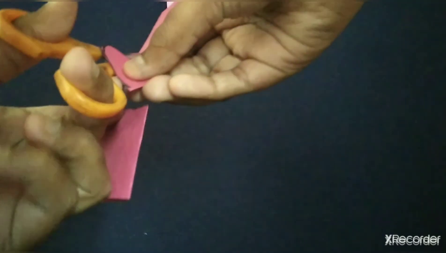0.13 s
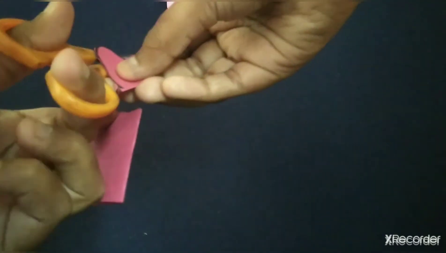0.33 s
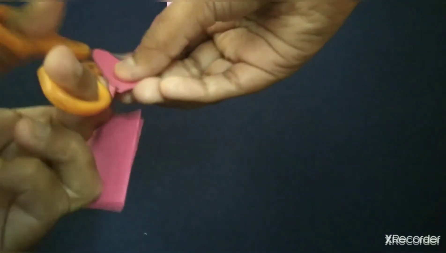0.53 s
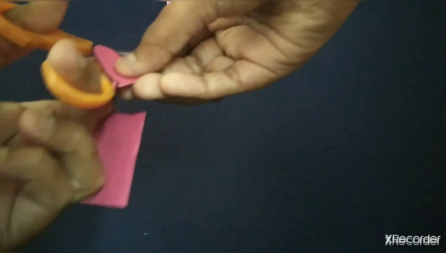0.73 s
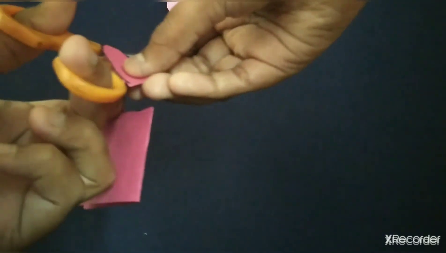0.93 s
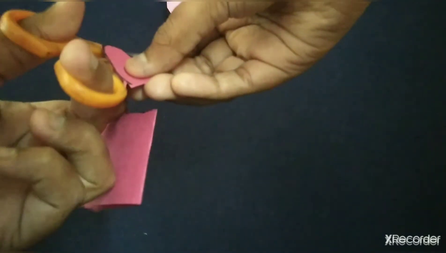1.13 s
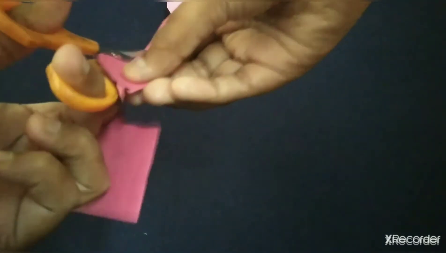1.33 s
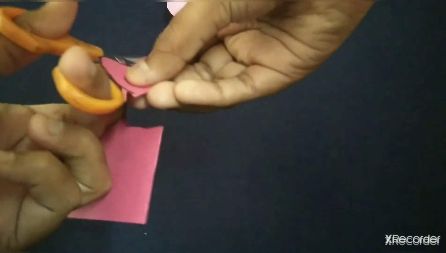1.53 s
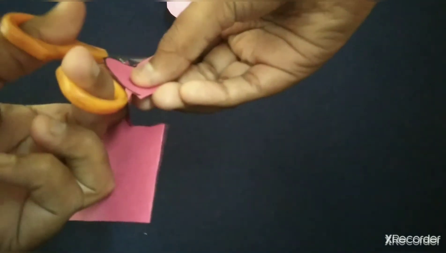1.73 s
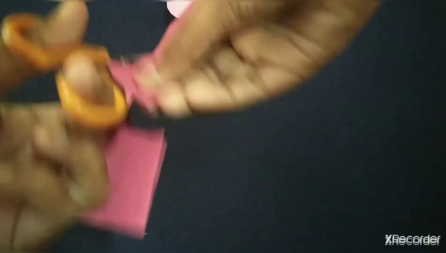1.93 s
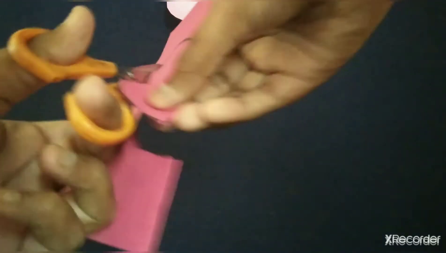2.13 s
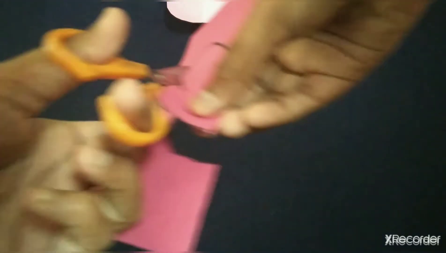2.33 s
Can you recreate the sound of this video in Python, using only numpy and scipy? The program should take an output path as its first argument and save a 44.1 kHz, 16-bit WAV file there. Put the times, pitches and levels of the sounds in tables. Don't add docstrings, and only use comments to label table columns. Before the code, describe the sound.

Three sharp, uneven snips of small scissors through stiff paper, each a cluster of metallic clicks and fibre tearing, separated by scraping blade openings; soft hand knocks, faint room hum, close and dry.

```python
import sys
import numpy as np
from scipy import signal
from scipy.fft import rfft, irfft
from scipy.io import wavfile
from scipy.ndimage import uniform_filter1d

SR = 44100
rng = np.random.default_rng(int(sys.argv[2]) if len(sys.argv) > 2 else 0)


def natural_amplitude(level_db):
    exponent = np.asarray(level_db, float) / 20
    return 10 ** exponent


def store_pcm(level_fs):
    pcm = np.round(np.clip(level_fs, -1, 1) * 32767).astype(np.int16)
    wavfile.write(sys.argv[1], SR, np.atleast_2d(pcm).T)


N = 110250

JERK_SKEW = .58


def evened(x):
    return x / np.sqrt(np.mean(x ** 2) + 1e-20)


def read(points, hz):
    f, value = np.transpose(points)
    return np.interp(np.log(hz + 1), np.log(f + 1), value)


def add(mix, s, sound):
    part = mix[max(round(s * SR), 0):][:len(sound)]
    part += sound[:len(part)]


def resonate(x, hz, width):
    turn = np.exp(2j * np.pi * hz * np.arange(len(x)) / SR)
    r = np.exp(-2 * np.pi * width / SR)
    return 2 * (turn * signal.lfilter([(1 - r) ** 2], [1, -2 * r, r * r], x / turn)).real


def colour(x, table):
    hz = np.fft.rfftfreq(len(x), 1 / SR)
    return irfft(rfft(x) * natural_amplitude(read(table, hz)), len(x))


def swell(length):
    t = np.arange(0, 2 * length, 1 / SR)
    return t, np.sin(np.pi * (t / (2 * length)) ** JERK_SKEW) ** 2


def paired(shared, own):
    own_share = 0.79
    return np.array([shared + own_share * own, shared - own_share * own])


def room_noise(table, level_db, patchy_db, size):
    # (frequency [Hz], likeness of left and right [0-1])
    likeness = [(100, .93), (420, .86), (1650, .3), (15000, .3)]
    # (frequency [Hz], left minus right [dB])
    balance = [(50, -1.5), (240, -1.5), (950, 4.5), (15000, -0.5)]
    frames, hz = 4 * N // size + 5, np.fft.rfftfreq(size, 1 / SR)
    a, b, c, d, patches = rng.standard_normal((frames, len(hz), 5)).T
    patches = uniform_filter1d(patches, size=6, axis=0)
    patches = evened(uniform_filter1d(patches, size=5, axis=1))
    same = np.clip(read(likeness, hz), -1, 1)[:, None]
    left = a + 1j * b
    right = same * left + np.sqrt(1 - same ** 2) * (c + 1j * d)
    lean = read(balance, hz)[:, None] / 2
    z = np.array([left, right]) * natural_amplitude(np.array([lean, -lean]))
    z *= natural_amplitude(read(table, hz)[:, None] + patchy_db * patches)
    x = signal.istft(z, nperseg=size, noverlap=3 * size // 4)[1][:, 512:N + 512]
    return natural_amplitude(level_db) * x / np.sqrt(np.mean(x.mean(0) ** 2))


def room_hum():
    # (frequency [Hz], level [dB])
    hum_spectrum = [(30, -25.5), (50, 2), (62, -0.5), (90, -18.5), (119, -0.5), (146, -4.5), (210, -15),
                    (380, -80)]
    return room_noise(hum_spectrum, -54, patchy_db=2.25, size=8192)


def room_air():
    # (frequency [Hz], level [dB])
    air_spectrum = [(200, -15.5), (280, -5), (420, -8.5), (800, -11.5), (1900, -17.5), (2650, -31),
                    (3150, -50), (16000, -51)]
    return room_noise(air_spectrum, -61, patchy_db=3.0, size=2048)


def table_bumps():
    # (start [s], level [dB], frequency [Hz])
    knocks = [
        (0.586, -41.5, 63.4),
        (0.68, -37.5, 62.6),
        (1.79, -48, 54.4),
        (2.479, -44.5, 59),
    ]
    length = 0.039
    out, t = np.zeros(N), np.arange(0, length, 1 / SR)
    for s, db, hz in knocks:
        add(out, s, natural_amplitude(db) * np.sin(np.pi * t / length) ** 2 * np.sin(2 * np.pi * hz * t))
    return out


def ticks():
    # (time [s], level [dB], frequency [Hz], time to peak [s])
    snaps = [(.247, -56.5, 7400, .003), (.310, -45.5, 10800, 0.0026), (.371, -44.5, 8540, 0.0016),
             (1.067, -62, 15300, .0004), (1.092, -48, 11300, .0012), (1.122, -63, 9000, .002),
             (1.699, -38, 6960, 0.0014), (1.696, -51, 12500, .0006), (1.7325, -50, 12000, .0006),
             (.3085, -55, 13000, 0.00055), (1.758, -61, 4300, 0.0023), (0.576, -42, 7500, 0.00098),
             (2.001, -83, 6160, 0.0051), (2.054, -72.5, 7000, 0.001)]
    out, t = np.zeros(N), np.arange(1500) / SR
    for s, db, hz, length in snaps:
        snap = evened(resonate(rng.standard_normal(1500), hz, 840))
        add(out, s - .001, natural_amplitude(db) * snap * (t / length) * np.exp(1 - t / length))
    return out


def grit(smooth):
    uneven_db, clicks_per_s = 4, 4000
    size = natural_amplitude(uneven_db * np.minimum(rng.exponential(1, N), 4))
    size = size * (rng.random(N) < clicks_per_s / SR)
    return evened(evened(size * rng.standard_normal(N)) + smooth * rng.standard_normal(N))


def fibre_cracks():
    # (centre [s], level [dB], length [s])
    partings = [(0.246, -58.5, 0.0061), (0.311, -42.5, 0.0065), (0.343, -53, 0.0051),
                (0.375, -45.5, 0.0047), (1.069, -50.5, 0.0062), (1.097, -45.5, 0.009), (1.128, -53, 0.0086),
                (1.336, -64, 0.0047), (1.667, -64.5, 0.007), (1.701, -40.5, 0.0072), (1.736, -46, 0.0053),
                (1.771, -46.5, 0.017), (2.423, -75.5, 0.02)]
    out = np.zeros(N)
    for s, db, length in partings:
        add(out, s - 1.02 * length, natural_amplitude(db) * swell(length)[1])
    return out


def strokes():
    # (time [s], fibre hiss [dB], blade ring [dB], depth [dB])
    closing = [
        [(.2, -126, -11, 15), (.225, -70, 12.5, -2), (.26, -67.5, 19.5, 0.5), (.3, -59, 1, 15),
         (.33, -57, 11.5, -4), (.365, -62.5, 14, 2), (.39, -66, 5.5, 7.5), (.41, -76, 12.5, 3),
         (.425, -100, 21, 1)],
        [(1.03, -100, 0, 0), (1.047, -80, 0, -3), (1.062, -68.5, 10.5, 15), (1.085, -57.5, 17.5, 6.5),
         (1.11, -52.5, 6.5, 10), (1.15, -59.5, 10, 2.5), (1.175, -70, -12, 14), (1.2, -96, -7.5, -0.5)],
        [(1.625, -87, 0.5, -13), (1.655, -70.5, 5, -8), (1.685, -51.5, 12.5, 5), (1.715, -56.5, 9.5, 5.5),
         (1.745, -56, 3, 6), (1.78, -61, 9.5, 8), (1.81, -69, 2.5, 8), (1.84, -86, 0, 14)],
    ]
    # (time [s], scrape hiss [dB], blade ring [dB], depth [dB])
    opening = [
        [(.47, -101, -3, -8), (.5, -65.5, 0, 4), (.513, -58, 14, -14), (.53, -50.5, 12, -4.5),
         (.58, -53.5, 14, 5.5), (.615, -67.5, 8.5, 7.5), (.645, -91, 4, -10)],
        [(1.25, -90, -3, -10), (1.265, -70.5, -1, 7), (1.288, -60.5, 10.5, -5), (1.305, -49.5, 7.5, -1),
         (1.345, -49.5, 6.5, 0.5), (1.4, -68, 6.5, -16), (1.43, -92, -4, -10.5)],
        [(2.11, -97.5, 8, -7.5), (2.128, -73.5, 14, 4.5), (2.162, -62, 5.5, 0.5), (2.2, -71, 4, -14),
         (2.225, -77.5, 13.5, -14.5), (2.26, -100, 15, -9)],
    ]
    # (frequency [Hz], width [Hz], level [dB])
    blade_modes = [(1956, 194, 3.5), (1668, 55, 9), (2120, 430, -13), (2800, 155, -8.5)]
    # (frequency [Hz], width [Hz], level [dB])
    deep_modes = [(506, 113, 2.5), (784, 132, 3), (1107, 101, 1.5), (1600, 37, 3)]
    # (frequency [Hz], level [dB])
    hiss_spectrum = [(1500, -15), (2400, -4), (3300, -9), (6500, -9), (9000, -12.5), (11000, -13),
                     (13000, -21), (15800, -32)]
    # (frequency [Hz], level [dB])
    sheet_spectrum = [(2200, -14), (4800, -13), (5200, 0)]
    slide_s = 2.0

    t, drive = np.arange(N) / SR, grit(0.24)
    hiss = evened(colour(grit(1.0), hiss_spectrum))
    hiss = np.where(t > slide_s, colour(hiss, sheet_spectrum), hiss)
    ring = evened(sum(natural_amplitude(db) * resonate(drive, hz, w) for hz, w, db in blade_modes))
    deep = evened(sum(natural_amplitude(db) * resonate(drive, hz, w) for hz, w, db in deep_modes))
    out = np.zeros(N)
    for curve in closing + opening:
        s, hiss_db, ring_db, deep_db = np.transpose(curve)
        level = natural_amplitude(np.interp(t, s, hiss_db, -140, -140))
        body = ring + natural_amplitude(np.interp(t, s, deep_db)) * deep
        out += level * (natural_amplitude(2.0) * hiss + natural_amplitude(np.interp(t, s, ring_db)) * body)
    return out + 0.91 * fibre_cracks() * hiss


def squeaks():
    # (centre [s], peak [dB], length [s], frequency [Hz])
    catches = [(.512, -41, .008, 2050), (.520, -39, .007, 1800), (.534, -32, .007, 1950),
               (.544, -40, .005, 2000), (.555, -37, .004, 2050), (.559, -38, .008, 1720),
               (.577, -33, .004, 600), (.586, -39, .005, 1500), (1.293, -42, .006, 1900),
               (1.304, -42, .009, 2000), (1.319, -40, .005, 1800), (1.318, -43, .007, 900),
               (1.328, -34, .016, 515), (1.329, -36, .005, 1850), (1.341, -43, .004, 1850),
               (1.348, -42, .004, 1900), (1.377, -45, .005, 1850), (1.668, -31, .009, 1380),
               (1.700, -37, .012, 560), (1.736, -42, .005, 1550), (1.758, -37, .004, 1450),
               (1.763, -36, .006, 1300), (1.760, -40, .007, 600), (2.126, -52, .008, 1950),
               (2.143, -51, .014, 1900), (.250, -30, .007, 1900), (.236, -46, .006, 1850),
               (1.670, -36, .004, 1950), (1.762, -40, .005, 1900), (.588, -38, .012, 1050)]
    ear_turn = .6
    out = np.zeros((2, N))
    chance = 2 * rng.random((len(catches), 2)) - 1
    for (s, db, length, hz), (turn, skew) in zip(catches, chance):
        t = np.arange(0, 2 * length, 1 / SR)
        shape = np.sin(np.pi * t / (2 * length)) ** 2
        for ear in range(2):
            tone = np.sin(2 * np.pi * hz * t + np.pi * turn + ear * ear_turn * skew)
            add(out[ear], s - length, natural_amplitude(db) * shape * tone)
    return out


def jerks():
    # (centre [s], peak [dB], length [s], low mode [Hz], high mode [dB])
    slips = [(.2455, -32, .004, 1050, 4), (.2483, -24, .006, 910, -3), (.2815, -27, .006, 1140, -5),
             (.3070, -29, .004, 1200, 0), (.3113, -14, .006, 1090, -11), (.3165, -19, .006, 935, -14),
             (.330, -36, .007, 930, -2), (.3410, -27, .005, 1050, -2), (.347, -32, .009, 940, -10),
             (.363, -37, .007, 1050, -8), (1.078, -35, .005, 950, -8), (1.099, -29, .003, 1050, -8),
             (.3717, -27, .0028, 1110, -1), (.5755, -24, .003, 1400, -6), (1.0660, -26, .0035, 1050, -12),
             (1.0702, -16, .0033, 935, -17), (1.090, -25, .003, 1130, -9), (1.0941, -15, .006, 1130, -20),
             (1.122, -34, .005, 1080, 1), (1.6635, -38, .004, 1250, -8), (1.6685, -27, .006, 1090, -5),
             (1.683, -44, .006, 1060, 2), (1.695, -36, .003, 1200, 3), (1.699, -27, .008, 1050, -10),
             (1.7605, -38, .009, 850, 0)]
    # (frequency [Hz], level [dB])
    side_modes = [(1450, -19), (2250, -31), (2690, -29)]
    high_hz, high_spread = 1890, .025
    handle_hz, handle_db = 574, -31
    new_grip_s, new_grip_db = 1.5, 11
    gain_db, rough_per_s = 1, 56
    ear_turn = 1

    out = np.zeros((2, N))
    for s, db, length, low_hz, high_db in slips:
        noise, chance = rng.standard_normal((2, 2400)), 2 * rng.random((2, 8)) - 1
        t, shape = swell(length)
        start = s - 2 * length * .5 ** (1 / JERK_SKEW)
        modes = [(low_hz, 0), (high_hz * (1 + high_spread * chance[0, 0]), high_db), (handle_hz, handle_db)]
        modes += [(hz, side_db + new_grip_db * (s > new_grip_s)) for hz, side_db in side_modes]
        for k, (hz, level_db) in enumerate(modes):
            rough = paired(*[evened(resonate(n, hz, 214))[200:][:len(t)] for n in noise])
            level = natural_amplitude(gain_db + db + level_db) * shape
            for ear in range(2):
                phase = np.pi * chance[0, k + 1] + ear * ear_turn * chance[1, k]
                tone = np.sin(2 * np.pi * hz * t + phase)
                add(out[ear], start, level * (tone + rough_per_s * length * rough[ear]))
    return out


def at_microphones(x):
    # (frequency [Hz], left minus right [dB])
    early_balance = [(500, 5), (1000, 7), (1450, 6.5), (2000, 1), (2900, 2), (4500, 3), (7200, 11.5),
                     (10000, -10)]
    # (frequency [Hz], left minus right [dB])
    late_balance = [(500, 0.5), (1000, 2.5), (1450, -3), (2000, 2.5), (2900, -1), (4500, 2), (7200, 9.5),
                    (10000, -7)]
    # (time [s], share of the early balance [0-1])
    hand_shift = [(1.2, 1), (1.27, 0)]
    # (frequency [Hz], level [dB])
    thin_bass = [(250, -26), (450, -4), (16000, 1)]
    t60_s, room_db, lag_s = .1, -22, .00003

    hz, t = np.fft.rfftfreq(N, 1 / SR), np.arange(8192) / SR
    tail = rng.standard_normal((2, len(t))) * natural_amplitude(-60 * t / t60_s) * (t > .004)
    taps = natural_amplitude(room_db) * tail / np.linalg.norm(tail[0])
    taps[:, 0] += 1
    wet = rfft(signal.fftconvolve(x, taps, axes=1)[:, :N]) * natural_amplitude(read(thin_bass, hz))
    wet[1] *= np.exp(-2j * np.pi * hz * lag_s)
    placed = []
    for balance in (early_balance, late_balance):
        lean = natural_amplitude(read(balance, hz) / 2)
        placed.append(irfft(wet * np.array([lean, 1 / lean]) * 2 / (lean + 1 / lean), N))
    share = np.interp(np.arange(N) / SR, *np.transpose(hand_shift))
    return share * placed[0] + (1 - share) * placed[1]


def scene():
    scissors = jerks() + squeaks() + paired(strokes(), strokes()) + paired(ticks(), ticks())
    return at_microphones(scissors) + table_bumps() + room_hum() + room_air()


def top_cut(x):
    return signal.sosfilt(signal.butter(12, 16400, fs=SR, output="sos"), x)


def record(dry):
    low_pass = signal.firwin(511, 16000, window=("kaiser", 9), fs=SR)
    limited = signal.oaconvolve(dry, low_pass[None], "same")
    return top_cut(limited)


dry = scene()
out = record(dry)
store_pcm(out)
```